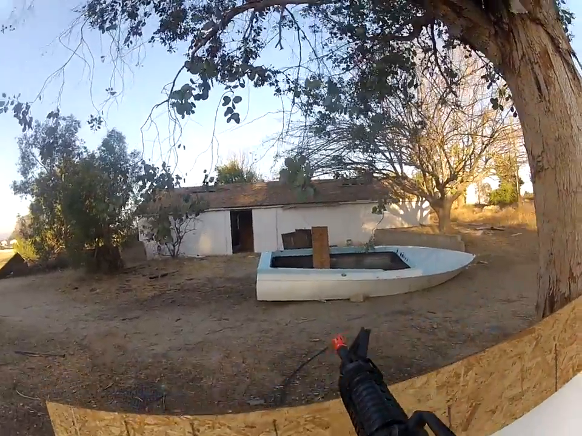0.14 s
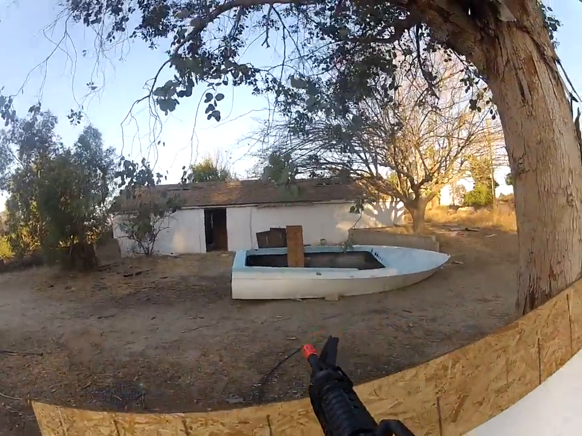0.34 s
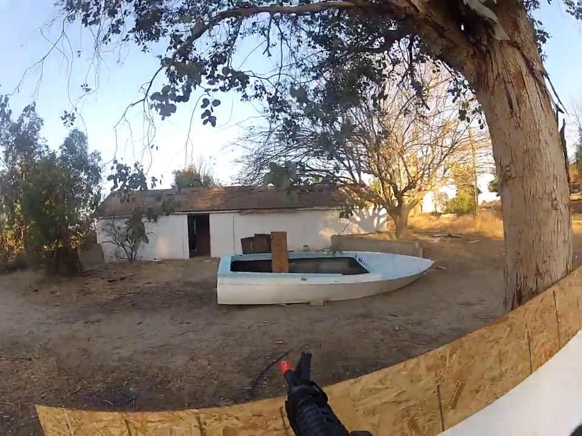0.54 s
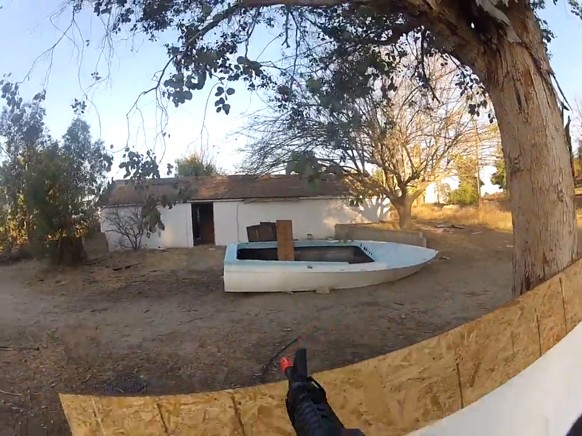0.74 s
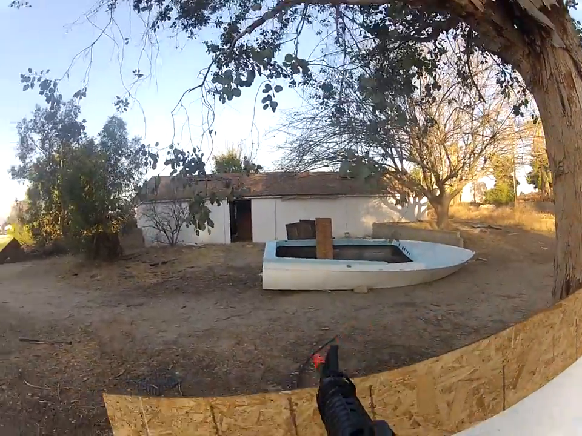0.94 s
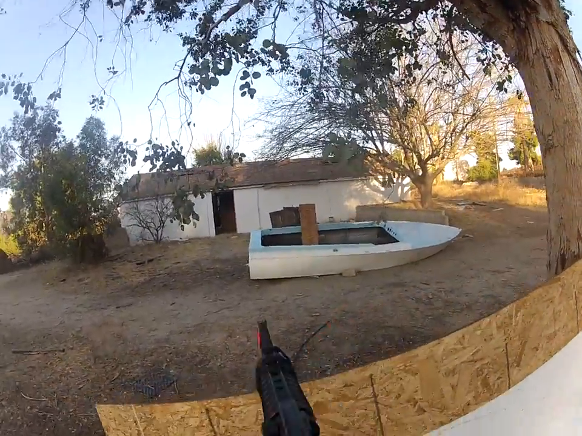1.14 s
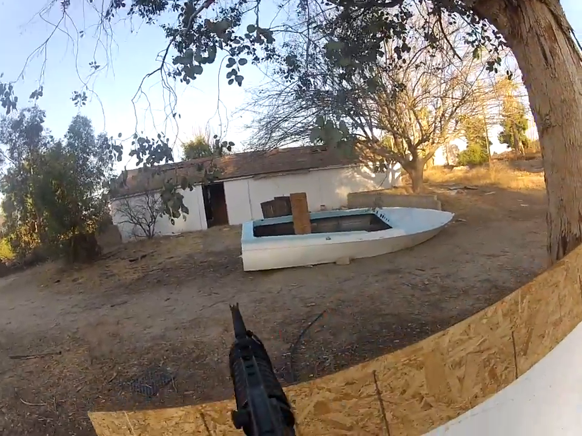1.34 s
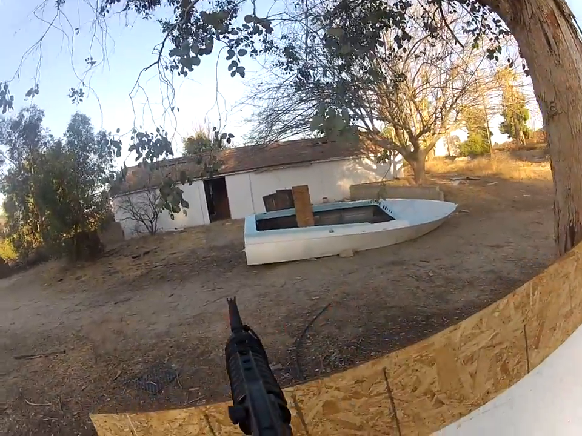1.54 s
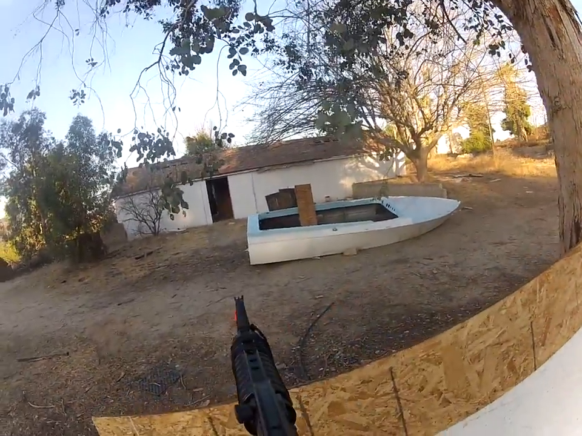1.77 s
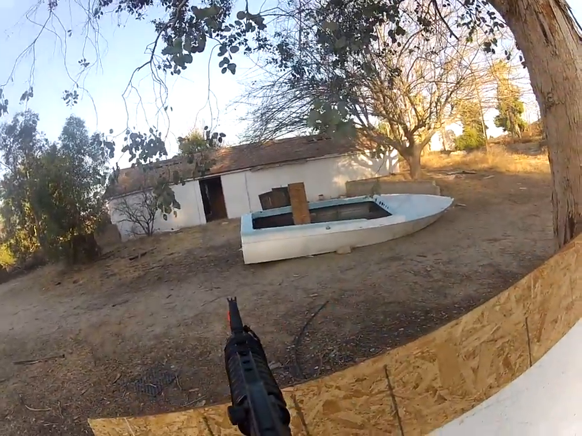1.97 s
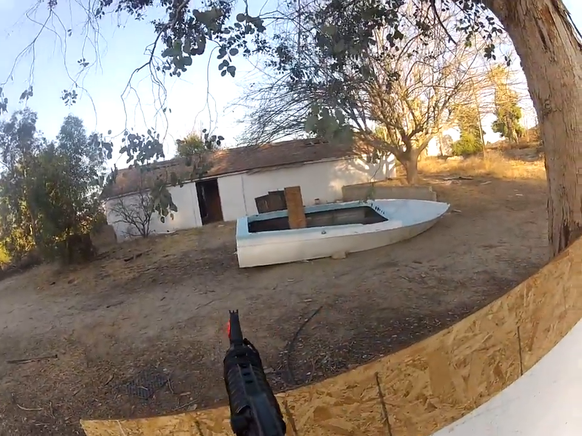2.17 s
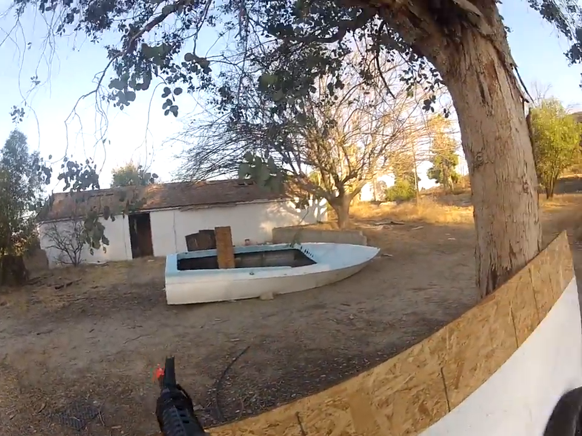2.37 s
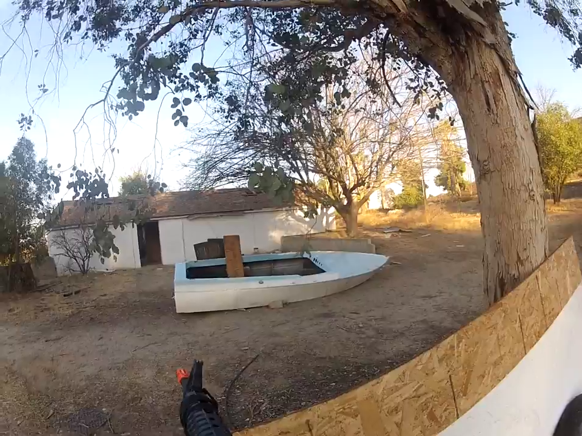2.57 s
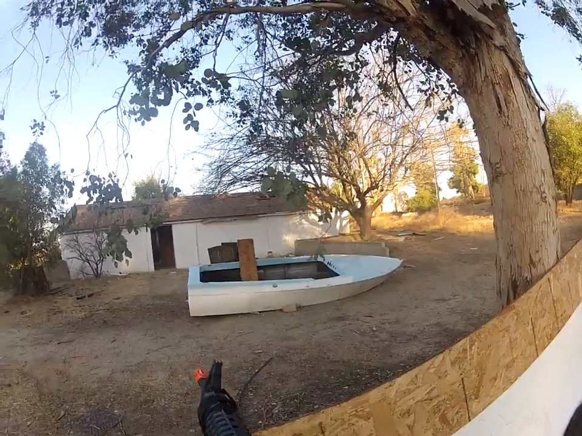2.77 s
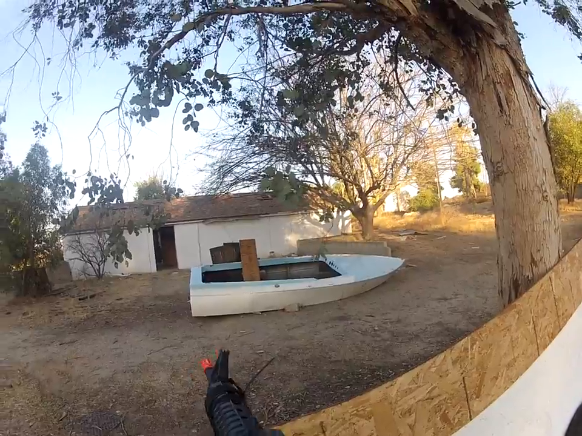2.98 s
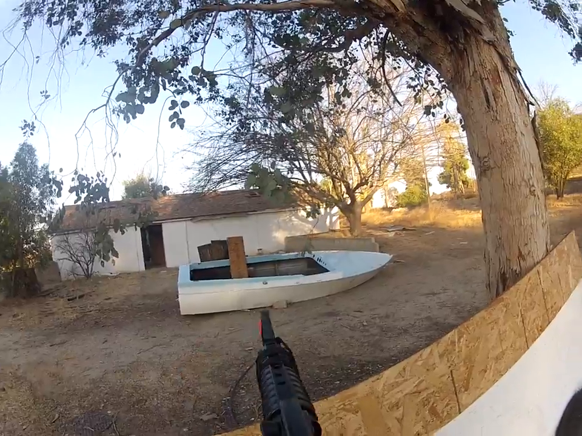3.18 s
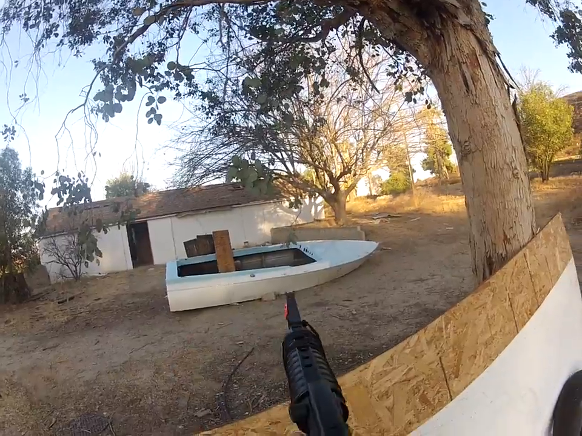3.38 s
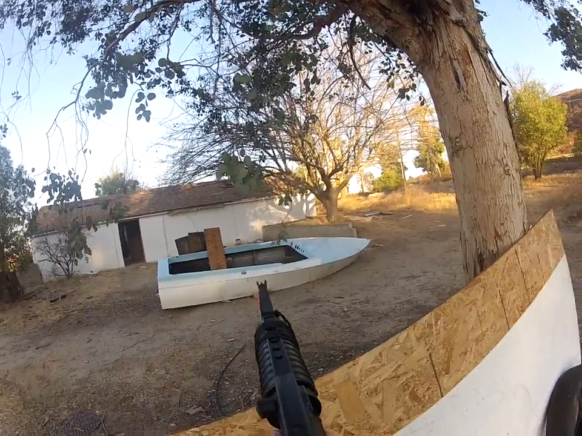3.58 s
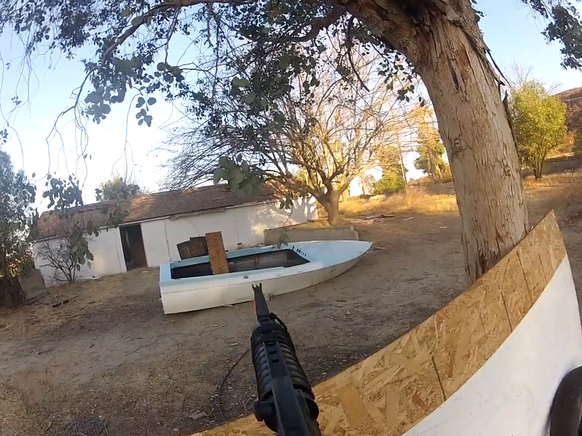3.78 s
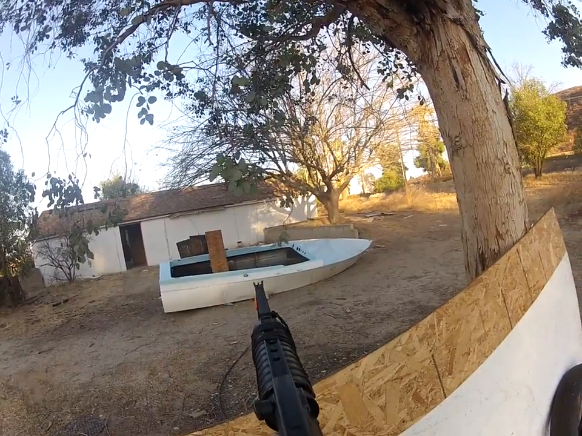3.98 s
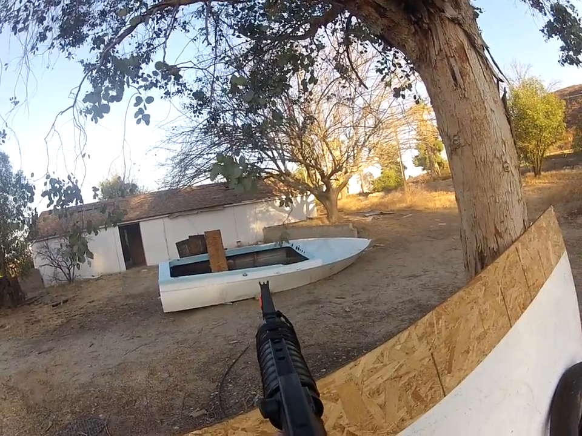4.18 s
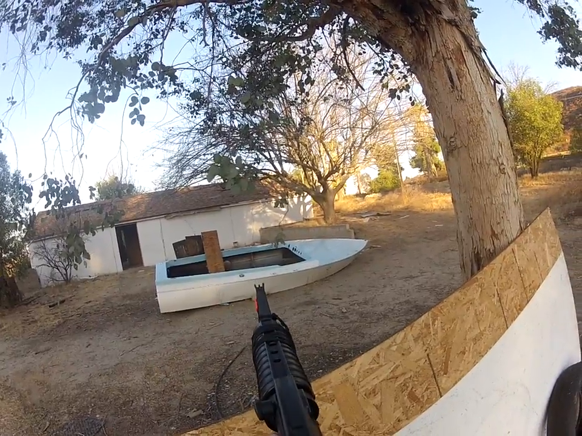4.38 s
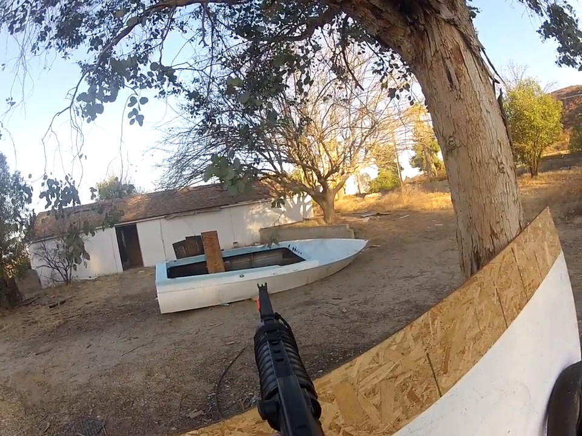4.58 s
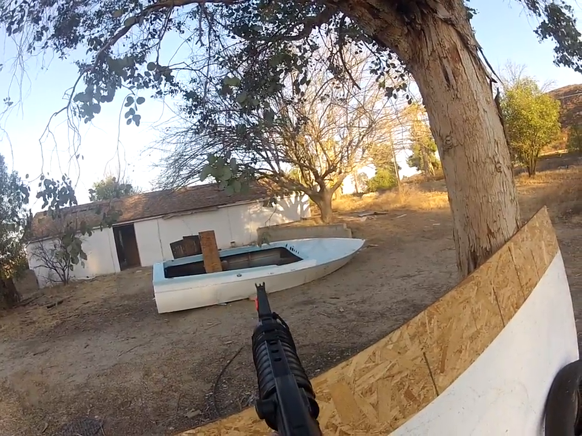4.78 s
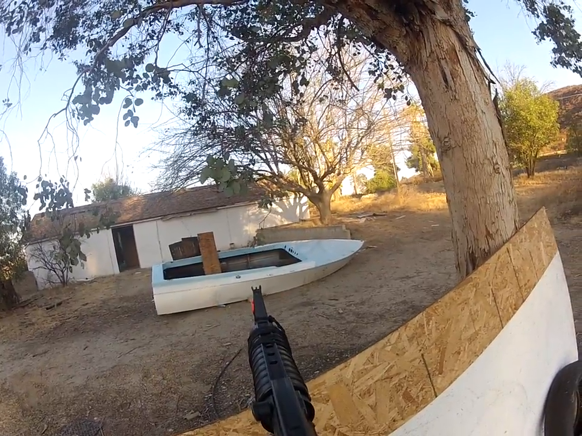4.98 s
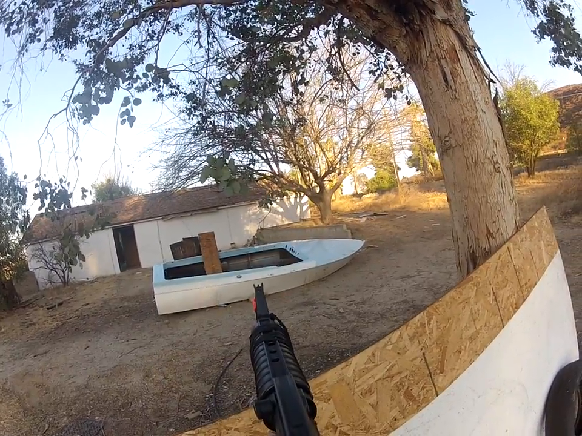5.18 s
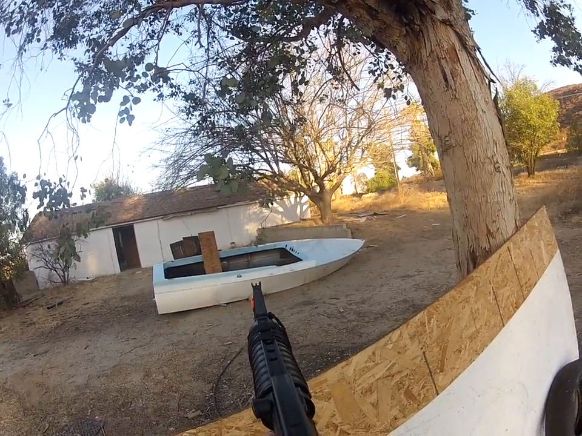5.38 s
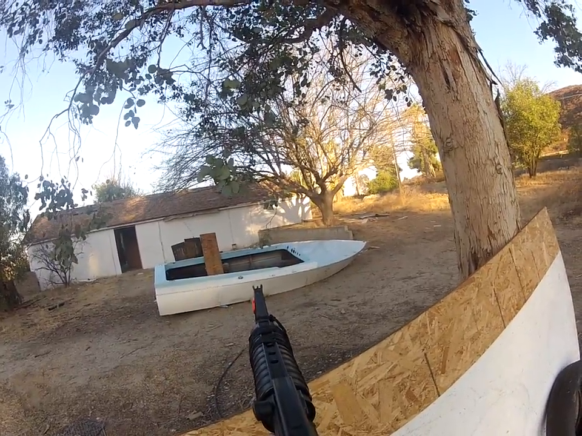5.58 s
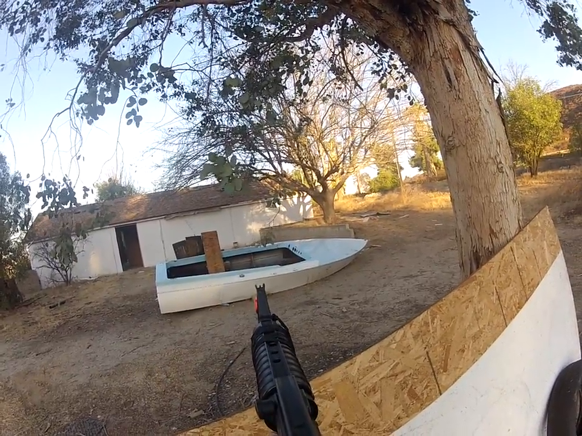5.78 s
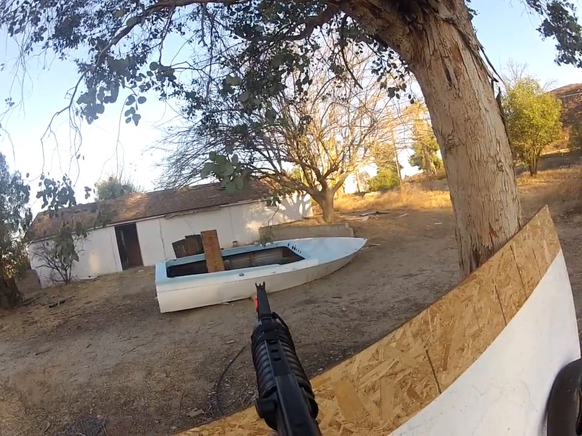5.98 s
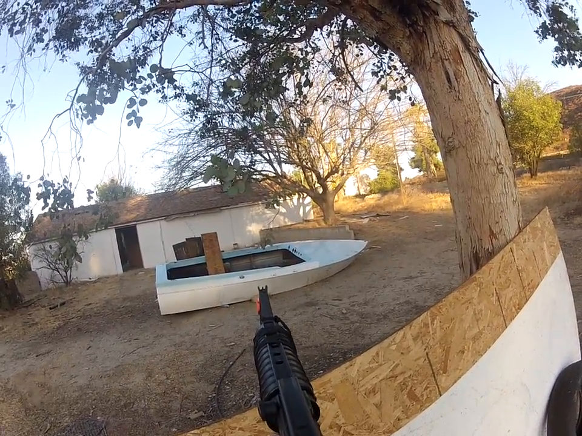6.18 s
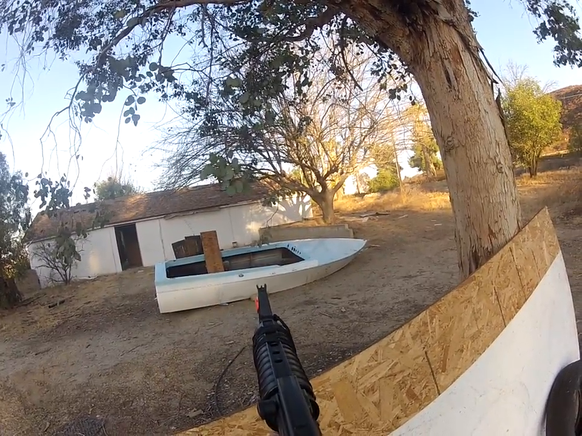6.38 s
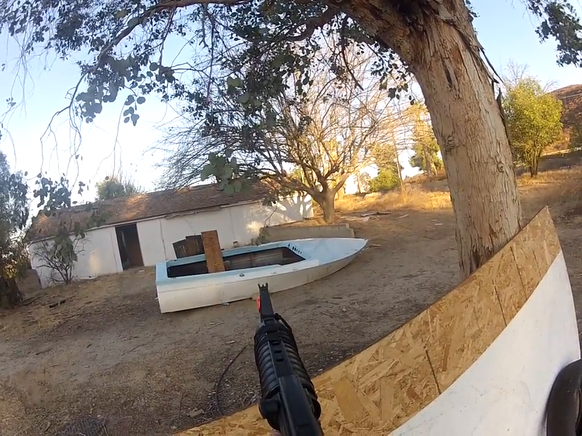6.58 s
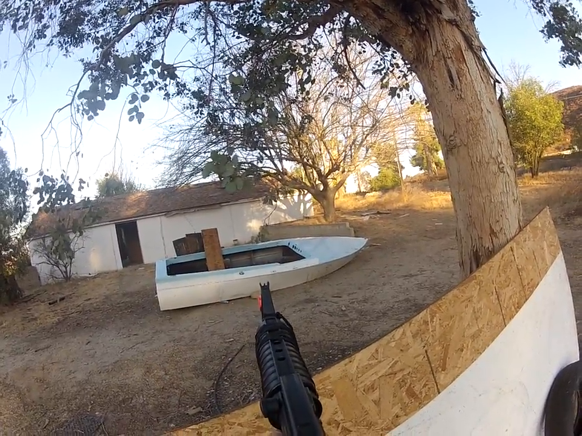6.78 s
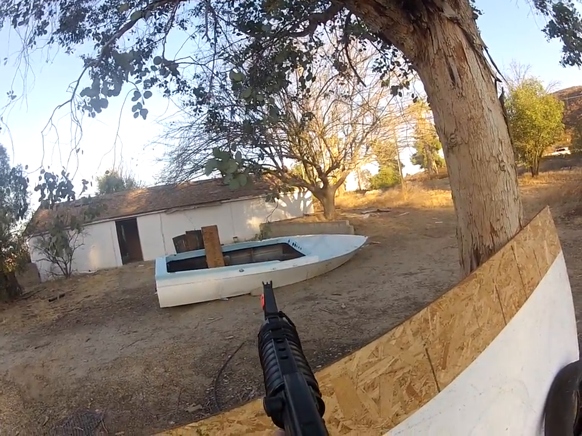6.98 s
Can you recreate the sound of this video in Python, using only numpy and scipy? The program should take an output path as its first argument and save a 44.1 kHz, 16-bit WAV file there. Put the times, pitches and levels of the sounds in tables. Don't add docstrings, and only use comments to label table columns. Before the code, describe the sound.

Close up outdoors, a toy rifle's motor whines through gears and its piston cracks: a rapid burst of three, then spaced shots, one doubled.

```python
import sys
import numpy as np
from scipy import signal
from scipy.fft import rfft, irfft
from scipy.io import wavfile
from scipy.ndimage import uniform_filter1d

SR = 44100
rng = np.random.default_rng(int(sys.argv[2]) if len(sys.argv) > 2 else 0)


def boost_factor(decibels):
    exponent = np.asarray(decibels, float) / 20
    return 10 ** exponent


def unload_wav(signal):
    wavfile.write(
        sys.argv[1],
        SR,
        np.round(np.clip(np.atleast_2d(signal).T, -1, 1) * 32767).astype(np.int16),
    )


N = 310023

# pitch_hz, level_db (per Hz)
MURMUR = [(71, -34), (120, -4), (151, -4), (220, -2.5), (326, -7), (359, -6), (452, -11.5), (1080, -20.5),
          (3610, -26), (5180, -27.5), (6000, -33), (7800, -68), (13200, -120)]
# pitch_hz, level_db (per Hz)
BREEZE_COLOUR = [(8.8, -31), (15, -1), (32, -2), (48, -1), (61, -1.5), (81, -7.5), (160, -13.5), (210, -31),
                 (350, -120)]
# time_s,
# level_db
BREEZE_LEVEL = [(0.0, -57.5), (0.4, -57.5), (1.29, -61), (1.51, -55), (1.76, -47), (1.94, -56), (2.8, -61),
                (3.39, -57.5), (3.739, -60.5), (3.93, -57.5), (5.15, -58.5), (5.582, -60.5), (5.97, -60.5),
                (6.27, -55), (6.42, -60), (7.03, -58.5)]
# start_s, peak_db, ring_hz, ring_db
LOOSE_TICKS = [(0.21, -46, 1800, 3), (0.336, -54, 2690, 7), (0.578, -53, 2620, 6), (1.513, -48.5, 2420, 2),
               (3.1, -50, 2400, -2), (3.131, -40.5, 2300, 11.5), (4.216, -43.5, 3050, -4),
               (4.44, -42, 2080, -2), (4.475, -53, 2450, 4), (4.687, -50, 3600, 8), (5.103, -43, 2860, 2),
               (5.897, -52, 3500, 14), (5.996, -48, 2700, 7.5)]
# start_s, sway_db, knock_db, wobble_db
HEAD_BUMPS = [
    (1.165, -41, -50.5, -67),
    (1.2928, -32.5, -47, -53),
    (1.356, -44, -62, -62),
    (1.463, -44, -66, -67),
    (3.986, -44, -40, -66),
]
# pitch_hz, t60_s
MOUNT_SWINGS = [(52.8, 0.15), (187, 0.05), (97, 0.056)]
# lag_ms, direction, sway_db, knock_db, wobble_db
SHOT_JOLTS = [
    (-6.5, -0.91, -36, -3, 1.5),
    (2.5, 1, -9.5, -38, -17.5),
    (5, -1.17, -2.5, -2.5, -4.5),
    (14.5, 0.87, 5.5, -16, -35),
]
# start_s, full_load_after_s, top_mesh_hz, trigger_click_db
PULLS = [
    (1.541, 0.053, 1150, -32),
    (1.757, .017, 1015, -60),
    (3.772, .048, 1492, -43),
    (4.261, 0.054, 1350, -41),
    (4.904, 0.05, 1099, -38),
    (5.508, 0.03, 1098, -39),
    (6.07, 0.052, 1501, -35),
]
PULL_WHINE_DB = [-10, -3, -6, -8, -11, -14, -5]
# length_s, level_db, end_mesh_hz, whine_db, song_db
RUN_ONS = [
    (.105, -35, 810, -22, -24),
    (.052, -48, 1000, -18, -24),
    (.068, -45, 900, -15, -14),
    (.068, -38.5, 760, -18, -16),
    (.08, -38.5, 340, -14.5, -12.5),
    (0.081, -37, 950, -9, -14.5),
    (.1, -36.5, 780, -9, -13),
    (0.063, -42.5, 1000, -9, -19),
    (0.065, -38, 280, -17.5, -14),
]
# multiple_of_mesh_rate, winding_db, running_on_db
MESH_TONES = [(1, -4, -14), (1.4, -10, -25), (2, 0, 0), (3, 0, -20)]
# pitch_hz, level_db
CASE_SONG = [(1085, -9), (2010, -2), (2610, 1), (4460, -1)]
# pitch_hz, width_hz, level_db
CASE = [(1102, 110, 1.5), (1603, 176, -3.5), (1994, 196, -0.3), (2620, 420, 4), (3040, 540, -11),
        (4025, 93, -6.5), (4180, 210, -25.5), (5630, 170, -12.5)]
# start_s, peak_db
CATCHES = [(1.615, -32), (1.773, -41), (1.878, -28.5), (3.883, -25), (4.355, -24.5), (4.925, -45),
           (4.986, -31), (5.527, -30), (5.572, -47), (5.659, -32), (5.677, -31), (6.186, -26)]
# start_s, peak_db, ring_hz
RELEASES = [
    (3.981, -33.5, 1990),
    (5.084, -32, 2330),
    (5.76, -36.5, 5400),
    (6.289, -34, 2000),
]
# lag_s, level_db
BOUNCES = [
    (0, 3),
    (.008, -3.5),
    (.024, -9.5),
]
# pitch_hz, t60_s, level_db, width_hz
TRIGGER_RING = (2620, 0.028, 2, 1100)
CATCH_RING = (2370, 0.045, 5, 1140)
# t60_s, level_db, width_hz
RELEASE_RING = (.036, 0.67, 740)
# pitch_hz, t60_s, level_db, width_hz
LATCH_RING = (3050, .04, 20, 300)
# start_s, peak_db, jolt_db, jolt_lag_ms
SLAMS = [
    (1.5983, -17.5, -33, 0.082),
    (1.7045, -16, -35.5, 0.087),
    (1.8444, -16.5, -36, 0.8),
    (3.8614, -15.5, -35, 0.1),
    (4.3294, -15, -34.5, 0.12),
    (4.9572, -16, -35.5, 0.1),
    (5.5394, -15, -37, 0.074),
    (5.6391, -15, -41, 4.2),
    (6.163, -16, -41.5, 4.11),
]
# lag_ms, level_db
CONTACTS = [(-7.0, -15), (-3.2, -13), (-1.3, -9), (-0.4, -2), (0.75, 0), (2.7, -5), (4.6, -8), (5.7, -8),
            (6.8, -11), (8.0, -13), (10.7, -12), (12.7, -17)]
# pitch_hz, level_db, t60_s
BODY = [(313, -26, 0.091), (686, -19, 0.022), (1580, -32, 0.021), (2158, -8, 0.016), (2473, -13.5, 0.026),
        (3014, -9, 0.014), (3770, -19.5, 0.027), (4350, -14.5, 0.0075), (4720, -15, 0.0057),
        (5560, -23.5, 0.016)]
# level_db, t60_s
CYLINDER = (-10.5, 0.015)
CYLINDER_HZ = [960, 965, 1030, 985, 982, 966, 968, 1020, 994]
# pitch_hz, level_db (per Hz)
SPREAD = [(12, -35), (20, -23), (86, 2), (723, -11.5), (4240, -14.5), (5940, -20), (8560, -19.5),
          (10000, -30), (13000, -52), (22000, -120)]

START_DB, FULL_LOAD_DB = -55.5, -37.5


def strikes(seconds, sizes):
    out = np.full(N, 1e-18)
    np.add.at(out, (np.ravel(seconds) * SR).round().astype(int), np.ravel(sizes))
    return out


def ring(clicks, hz, t60):
    r, w = boost_factor(-60 / (t60 * SR)), 2 * np.pi * hz / SR
    return signal.lfilter([0, np.sin(w)], [1, -2 * r * np.cos(w), r * r], clicks)


def resonance(x, hz, width_hz):
    r = np.exp(-np.pi * width_hz / SR)
    top = np.array([1, 0, -1]) * (1 - r * r) / 2
    return signal.lfilter(top, [1, -2 * r * np.cos(2 * np.pi * hz / SR), r * r], x)


def rms_one(x):
    return x / np.sqrt(np.mean(x ** 2) + 1e-20)


def coloured(spectrum):
    hz, db = np.transpose(spectrum)
    grid = np.arange(1, N // 2 + 2) * SR / N
    shape_db = np.interp(np.log(grid), np.log(hz), db, -90, -90)
    return rms_one(irfft(rfft(rng.standard_normal(N)) * boost_factor(shape_db), N))


def drift(rate_hz):
    smooth = signal.butter(2, rate_hz, fs=SR, output="sos")
    return rms_one(signal.sosfilt(smooth, rng.standard_normal(N)))


def without_lows(x, hz):
    return signal.sosfilt(signal.butter(2, hz, "high", fs=SR, output="sos"), x)


def gear_case(x):
    return sum(boost_factor(db) * (-1) ** k * resonance(x, hz, width) for k, (hz, width, db) in enumerate(CASE))


def yard():
    s, db = np.transpose(BREEZE_LEVEL)
    breeze_db = np.interp(np.arange(N) / SR, s, db) + 2.8 * drift(6.8)
    breeze = boost_factor(breeze_db) * coloured(BREEZE_COLOUR)
    murmur = boost_factor(-61 + 0.5 * drift(2.3)) * coloured(MURMUR)
    return murmur + breeze


def rattles():
    loose = [(s, db, hz, 0.033, ring_db, 1100) for s, db, hz, ring_db in LOOSE_TICKS]
    trigger = [(s, click_db, *TRIGGER_RING) for s, _, _, click_db in PULLS]
    catches = [(s, db, *CATCH_RING) for s, db in CATCHES]
    latch = [(row[0] + 0.0895, -54, *LATCH_RING) for row in SLAMS]
    released = [(s + lag, db + less_db, hz, *RELEASE_RING)
                for s, db, hz in RELEASES for lag, less_db in BOUNCES]
    return trigger + catches + latch + released + loose


def ticks(case_db, bare_db, rise_s):
    rows = rattles()
    burst, rung = np.zeros(N), np.zeros(N)
    age = np.arange(3000) / SR
    noises = rng.standard_normal((len(rows), len(age)))
    for (s, db, hz, t60, ring_db, width_hz), noise in zip(rows, noises):
        i = round(s * SR)
        rattle = boost_factor(db - 60 * age / t60) * noise * np.minimum(age / rise_s, 1)
        burst[i:i + len(age)] += rattle
        part = resonance(resonance(rattle, hz, width_hz), hz, width_hz)
        rung[i:i + len(age)] += boost_factor(ring_db) * part
    return rung + boost_factor(case_db) * gear_case(burst) + boost_factor(bare_db) * without_lows(burst, 900)


def mount():
    s, _, jolt_db, lag_ms = np.transpose(SLAMS)[:, :, None]
    ms, sign, *shot_db = np.transpose(SHOT_JOLTS)
    bump_s, *bump_db = np.transpose(HEAD_BUMPS)
    at = s + (ms + lag_ms * (ms > 0)) / 1000
    out = 0
    for (hz, t60), a, b in zip(MOUNT_SWINGS, shot_db, bump_db):
        pushes = strikes(at, sign * boost_factor(jolt_db + a)) - strikes(bump_s, boost_factor(b))
        out = out + ring(pushes, hz, t60)
    return out


def motor():
    free_hz = 1407
    sag, brake = 31, 666
    creep_db, creep_fall, creep_s = -41, 200, 0.06
    start_share, spin_up_share = 0.5, 1.4
    t, slam_s = np.arange(N) / SR, np.transpose(SLAMS)[0]
    state = np.zeros((5, N))
    state[0] = -120
    for s, (length, db, end_hz, whine_db, song_db) in zip(slam_s, RUN_ONS):
        here = (t >= s) & (t < s + length + creep_s)
        age = t[here] - s
        unloaded_db = -4 * (age < 0.02)
        turning_db = db + unloaded_db - sag * age - brake * np.maximum(age - length, 0)
        state[0, here] = np.maximum(turning_db, np.minimum(creep_db - creep_fall * age, db))
        state[1, here] = np.maximum(free_hz + (end_hz - free_hz) * age / length, 100)
        state[2:, here] = [[whine_db], [song_db], [0]]
    for (s, rise, top_hz, _), whine_db in zip(PULLS, PULL_WHINE_DB):
        here = (t >= s) & (t < slam_s[slam_s > s][0])
        age = t[here] - s
        state[0, here] = START_DB + (FULL_LOAD_DB - START_DB) * np.minimum(age / rise, 1)
        missing = np.cos(np.pi / 2 * np.minimum(age / (spin_up_share * rise), 1)) ** 2
        state[1, here] = top_hz * (1 - (1 - start_share) * missing)
        state[2:, here] = [[whine_db], [-18], [1]]
    return state


def gears(level_db, per_s, uneven_db, throb_db, through_db):
    hit = rng.random(N) < per_s / SR
    size = boost_factor(uneven_db * np.minimum(rng.exponential(1, N), 3))
    teeth = hit * size * rng.choice([-1, 1], N) * boost_factor(throb_db * drift(144))
    rattle = rms_one(gear_case(teeth) + boost_factor(through_db) * without_lows(teeth, 800))
    return uniform_filter1d(boost_factor(level_db), size=130) * rattle


def whine(state, wobble, flutter_db, swell_db):
    level_db, mesh_hz, whine_db, song_db, winding = state
    below_full_db = level_db - FULL_LOAD_DB
    pitches = []
    for k, on_db, off_db in MESH_TONES:
        thinned_db = on_db + (k - 1) * 0.3 * below_full_db
        pitches.append((k * mesh_hz, whine_db + np.where(winding, thinned_db, off_db)))
    for hz, db in CASE_SONG:
        pitches.append((hz, song_db + db + swell_db * drift(4.8)))
    tones = []
    for hz, db in pitches:
        loudness = uniform_filter1d(boost_factor(level_db + db + flutter_db * drift(91)), size=130)
        turns = np.cumsum(hz * (1 + wobble * drift(97))) / SR
        tones.append(loudness * np.sin(2 * np.pi * turns))
    tones[3] = resonance(tones[3], 4370, 500)
    return sum(tones)


def slams(scatter_db, slip_ms, puff_db, puff_t60):
    s, peak_db = np.transpose(SLAMS)[:2, :, None]
    ms, contact_db = np.transpose(CONTACTS)
    at = s + (ms + slip_ms * rng.standard_normal((len(s), len(ms)))) / 1000
    body = 0
    for k, (hz, db, t60) in enumerate(BODY):
        hit_db = peak_db + contact_db + db + scatter_db * rng.standard_normal(at.shape)
        body = body + (-1) ** k * ring(strikes(at, boost_factor(hit_db)), hz, t60)
    db, t60 = CYLINDER
    sizes = boost_factor(peak_db + db + scatter_db * rng.standard_normal(s.shape))
    boom = 0
    for when, size, hz in zip(s, sizes, CYLINDER_HZ):
        first = ring(strikes(when + 0.0008, size), hz, t60)
        boom = boom + ring(first, 1.04 * hz, t60)
    boom = boom * 40 / (t60 * SR)
    puff = signal.lfilter([1], [1, -boost_factor(-60 / (puff_t60 * SR))], strikes(s, boost_factor(peak_db + puff_db)))
    slam = body + boom + gear_case(puff * rng.standard_normal(N))
    return slam - 1.4 * resonance(slam, 478, 220)


def scene():
    state = motor()
    sound = yard() + ticks(case_db=1.5, bare_db=-3.5, rise_s=0.0013) + mount()
    sound = sound + gears(state[0], per_s=6000, uneven_db=2.5, throb_db=2.5, through_db=-6.5)
    sound = sound + whine(state, wobble=0.00491, flutter_db=4.0, swell_db=2.0)
    sound = sound + slams(scatter_db=1.5, slip_ms=0.03, puff_db=-9.5, puff_t60=0.035)
    return np.tile(sound, (2, 1))


def roll_off(x):
    return signal.sosfilt(signal.butter(12, 15850, fs=SR, output="sos"), x)


def record(dry):
    guarded = signal.sosfilt(signal.butter(6, 5850, fs=SR, output="sos"), dry[0])
    held = np.repeat(signal.resample_poly(guarded, 40, 147), 4)
    mid = signal.resample_poly(held, 147, 160)[:N]
    mid = mid + boost_factor(-87.5) * rng.standard_normal(N)
    mid = signal.sosfilt(signal.cheby2(16, 55, 15650, fs=SR, output="sos"), mid)
    side = boost_factor(-78) * coloured(SPREAD)
    return roll_off(np.array([mid + side, mid - side]))


dry = scene()
out = record(dry)
unload_wav(out)
```